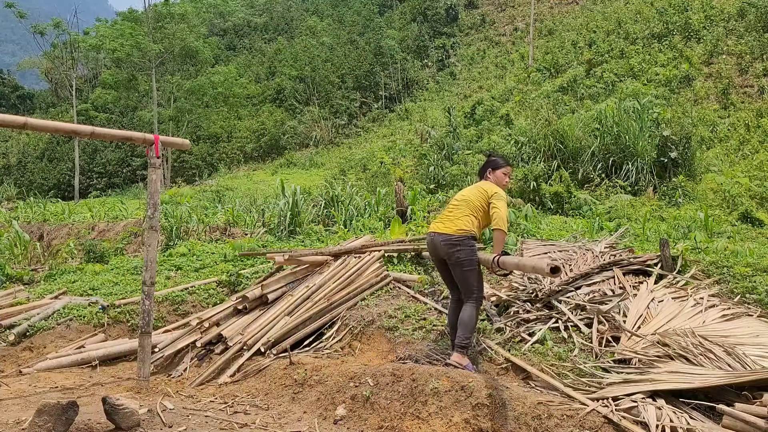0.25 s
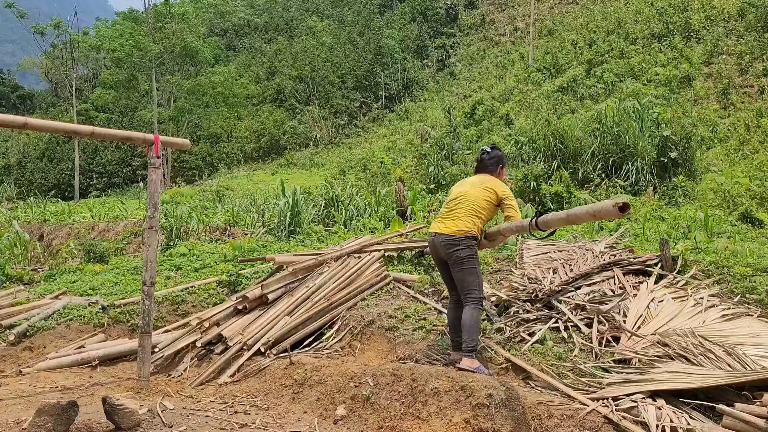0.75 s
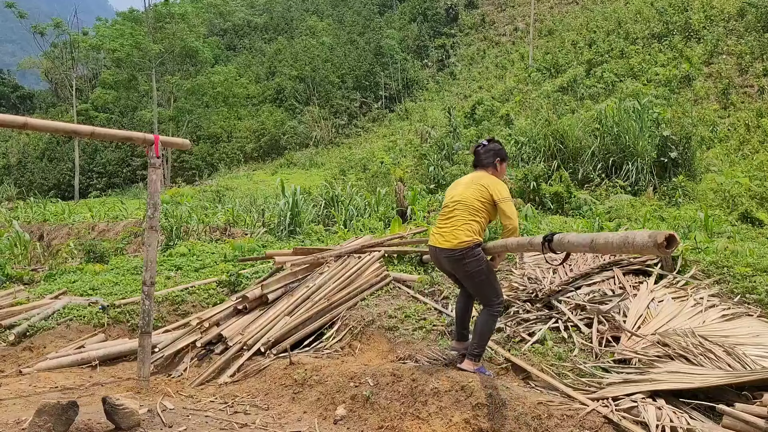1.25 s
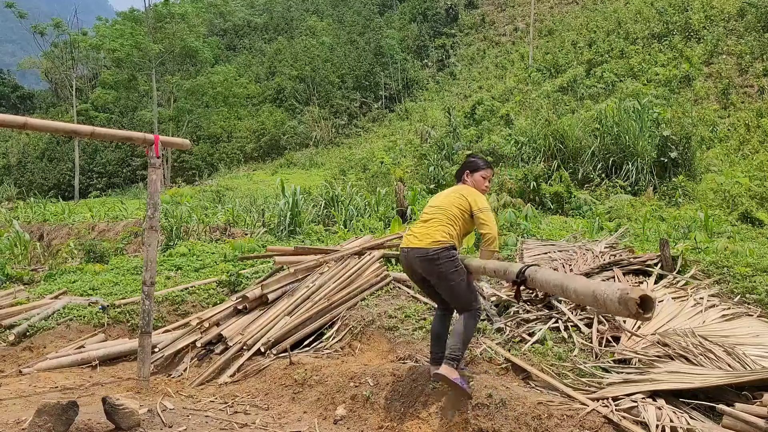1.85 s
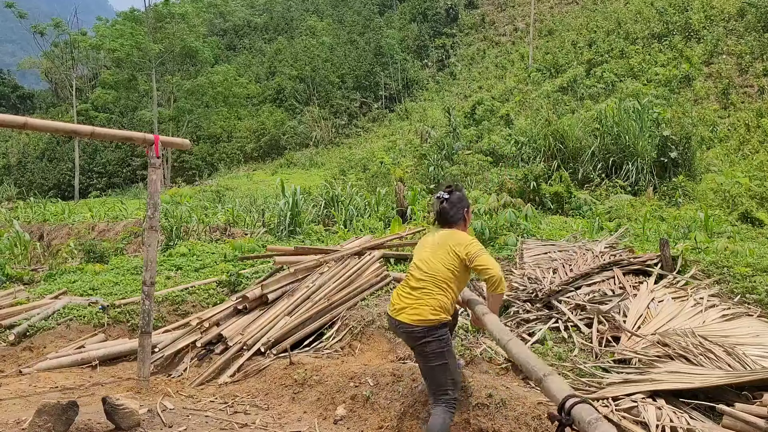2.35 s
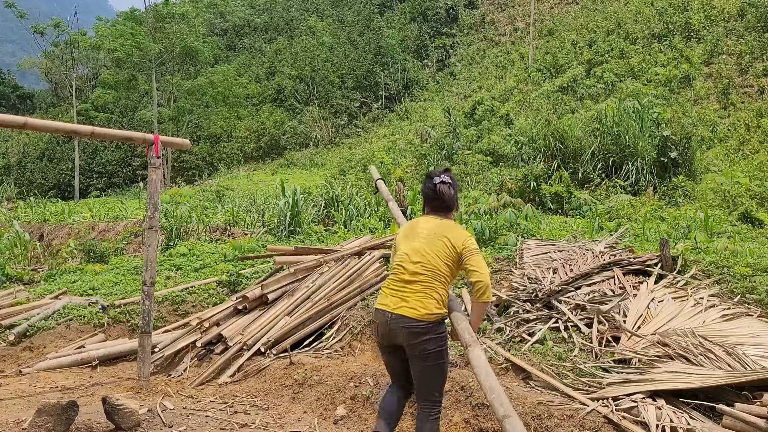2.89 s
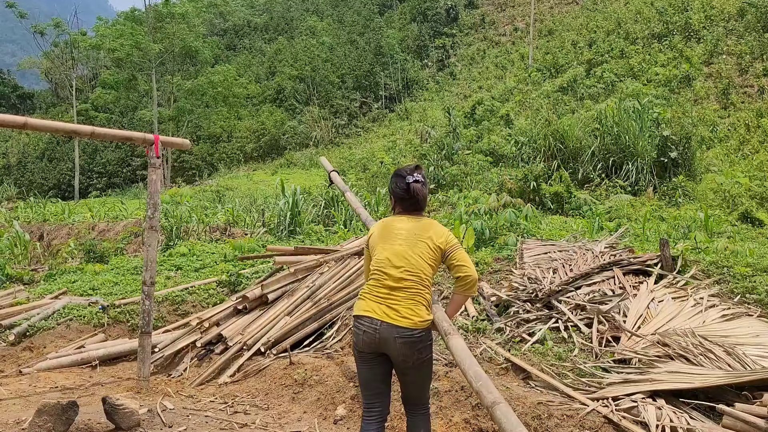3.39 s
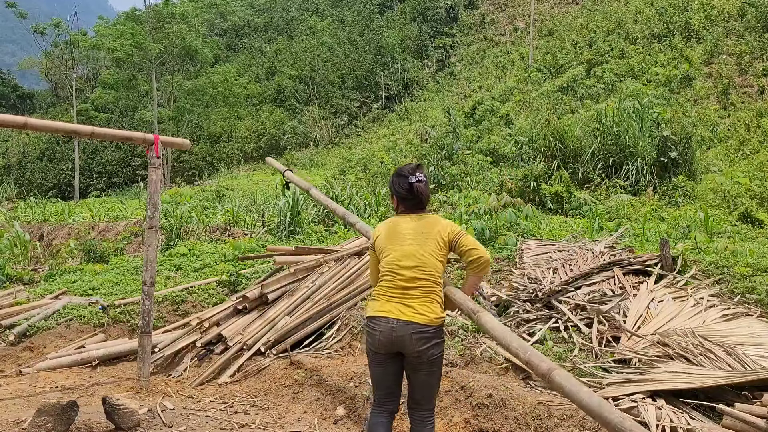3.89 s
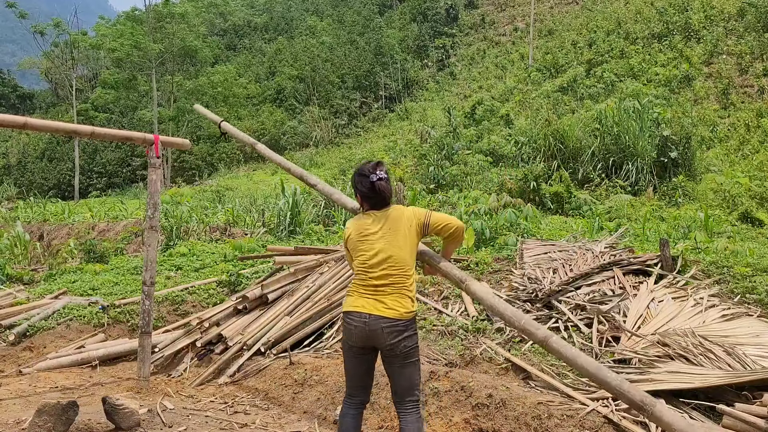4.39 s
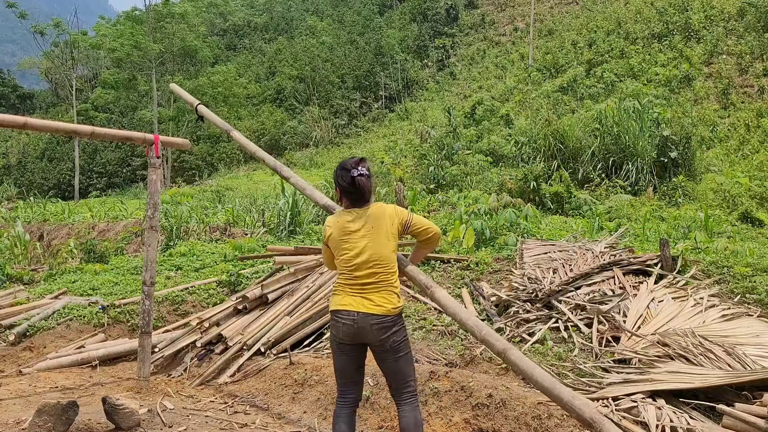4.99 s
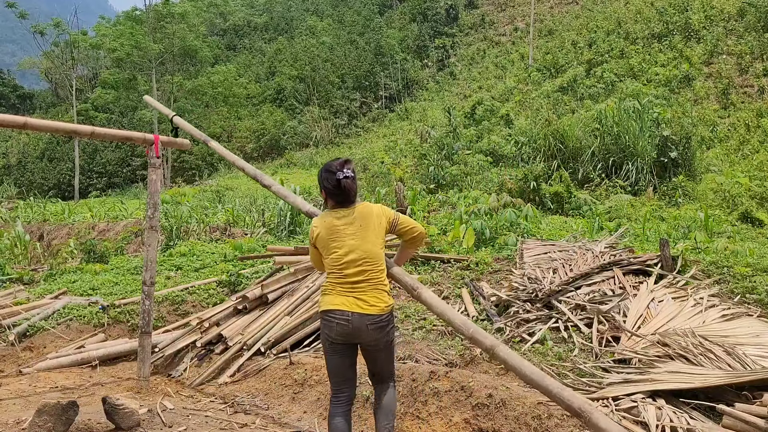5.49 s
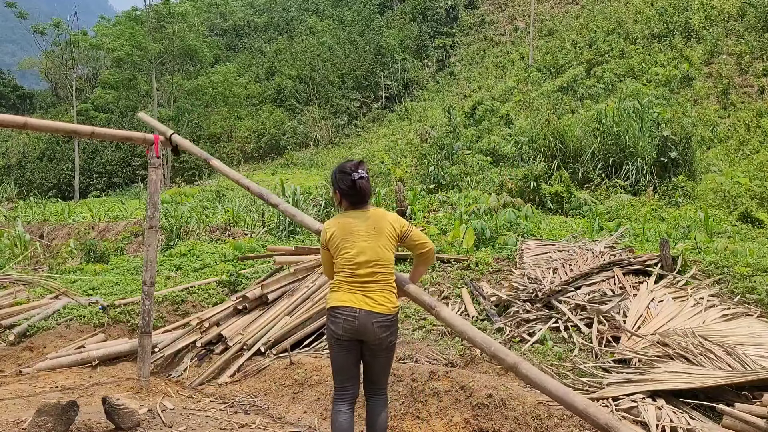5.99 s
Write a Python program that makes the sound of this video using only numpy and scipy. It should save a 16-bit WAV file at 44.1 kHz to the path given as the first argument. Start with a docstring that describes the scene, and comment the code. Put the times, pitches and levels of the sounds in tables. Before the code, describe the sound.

An open hillside with very quiet air, faint far insects and a little echo from trees. From 0 to 0.9 s a hollow bamboo pole knocks irregularly on a pile, strongest around 0.5 and 0.85, with dull short-ringing thuds, scraping and dry leaf rustle. More lighter knocks and sliding run from 1.2 to 1.9 s, while a small bird repeats quick two-note chirps from 1 to 1.8. It calms; leaves scuff at 2.2, then a hollow bump and bright dry snaps come at 2.9, with small crackles afterward. The bird returns from 3.6 to 4.8. At 4.5 a loud, hollow woody clack bursts in a tight cluster. Strong low wind puffs buffet the microphones from 5.0 to 5.8. Hard knocks follow at 5.75 and 5.88, toward the left, and a lighter one at 6.25, with a last chirp.

```python
"""On an open hillside a long hollow bamboo pole is dragged off a pile, swung round and knocked against a frame.
Clicks of contact set off the pole's fading tones; sparse clicks and noise make dry leaves rustle and snap.
Filtered noise and short low waves make wind puff at the microphones, and noise in drifting patches makes the
quiet air and far insects. Wavering tones along pitch curves make a small bird's two-note song and farther calls."""
import sys
import numpy as np
from scipy import signal
from scipy.fft import rfft, irfft
from scipy.io import wavfile
from scipy.ndimage import uniform_filter1d, map_coordinates

SR = 44100
rng = np.random.default_rng(int(sys.argv[2]) if len(sys.argv) > 2 else 0)


def bounce(signal):
    """Save signal as a 16-bit WAV file at the path given by the first command-line argument."""
    frames = np.transpose(np.atleast_2d(signal))
    limited = np.clip(frames, -1, 1)
    pcm = np.round(limited * 32767).astype(np.int16)
    wavfile.write(sys.argv[1], SR, pcm)


N = 275625

# Blows and bounces of the pole: [t/s, strength as base level/dB, hardness as clack over hollow thud level/dB,
# favoured f/Hz]
KNOCKS = [(0.0, -51.5, -5.5, 350), (.118, -44.5, 9, 1140), (.135, -54, -18.5, 310), (.184, -52.5, -4, 1250),
          (.341, -57.5, -18.5, 320), (.373, -56.5, -10, 310), (.426, -61.5, -11, 310),
          (.476, -47.5, -10.5, 320), (.493, -38, -5, 310), (.53, -37.5, -10, 350), (.573, -49.5, -5.5, 360),
          (.654, -43, -5.5, 355), (.69, -46.5, -4.5, 240), (.825, -42, -13.5, 490), (.839, -41, -8, 245),
          (.859, -43, -8, 300), (.886, -47, -7, 300), (1.184, -44, -9, 360), (1.201, -53, -8, 350),
          (1.247, -50.5, -11, 430), (1.304, -59, -11, 310), (1.333, -50, -2.5, 990),
          (1.402, -63.5, -27, 240), (1.477, -50.5, -3, 235), (1.559, -56.5, -1, 740), (1.638, -71, 8, 1200),
          (1.718, -61, 3, 1050), (1.829, -50, -5.5, 1090), (1.846, -59.5, -19, 300),
          (2.273, -60.5, 5, 1945), (2.887, -41.5, -10.5, 350), (2.913, -45.5, -8, 590),
          (2.95, -56, -12.5, 240), (4.488, -23, -3, 715), (4.494, -25.5, -4, 420), (4.508, -22.5, -10, 665),
          (4.528, -28, -2.5, 700), (4.544, -32.5, 8, 310), (4.594, -57, -19, 363), (4.621, -68.5, 4, 2200),
          (5.666, -65, -21, 250), (5.756, -24.5, -0.5, 420), (5.774, -28.5, -7, 450),
          (5.827, -46.5, -12, 460), (5.875, -25, 9.5, 660), (5.89, -38, -14, 435),
          (5.945, -61.5, -27.5, 450), (6.145, -67, -9, 440), (6.244, -33.5, 4.5, 575)]
# Ring of the pole walls and of the air between the nodes: [f/Hz, relative level/dB, time to fall 60 dB t/s]
POLE_MODES = [(85, -22.5, 0.28), (120.2, -14, 0.17), (241.8, 3, 0.073), (307, 0, 0.11), (355.3, -1, 0.12),
              (426.4, -1, 0.13), (498.8, -6, 0.12), (581, 10, 0.017), (680, -1.5, 0.065), (729.6, 0, 0.035),
              (853, 2, 0.024), (1013, 4, 0.017), (1155, -4, 0.035), (1260, -3.5, 0.032), (1390, -6.5, 0.03),
              (1505, -4.5, 0.028), (1718, -4.5, 0.017), (1951, -11.5, 0.037), (2193, -10, 0.033),
              (2293, -9.5, .04)]
# Tone colour of the dry crack of the contact itself: [f/Hz, relative level/dB per Hz]
CRACK_COLOUR = [(1350, -26), (2300, 3), (4660, -13), (6990, -24.5), (7640, -21.5), (10300, -30.5),
                (15000, -35), (16000, -37.5)]
# Pole sliding over the pile: [t/s, pressure as base level/dB]
DRAG = [(0.0, -73), (0.15, -63), (0.56, -71), (0.74, -56.5), (0.92, -73), (1.17, -65), (1.4, -54.5),
        (1.57, -73.5), (1.8, -70), (1.98, -73), (2.1, -106)]
# The knocking end moves from the middle to the right, then to the left: [t/s, lag of the left ear/samples]
SWING = [(0, 0), (2.2, 2), (2.9, 8), (4.5, 8), (5.6, -7), (6.25, -8)]
# Dry leaves stirred: [t/s, fine hiss level/dB, coarser crackle over the hiss level/dB]
RUSTLE = [(0.0, -50, -4), (0.08, -66, -4), (0.3, -69, -9), (0.5, -59, -6.5), (0.63, -62, -1.5),
          (0.73, -59.5, -2), (0.85, -63, -6), (1.34, -56.5, -3.5), (1.64, -71, 8), (2.05, -72, -15),
          (2.82, -77, -19), (2.89, -67.5, 10.5), (3.03, -73, 6), (3.38, -63, -35), (3.78, -87, 1),
          (4.14, -84, 11), (4.47, -76, -12), (4.65, -69, -12), (5.28, -72, -1.5), (5.5, -69.5, -6.5),
          (5.88, -74.5, 19), (6.25, -86, 8)]
# Feet or the pole end brushing dry leaves: [t/s, length t/s, base level/dB]
SCUFFS = [(2.215, .13, -66), (2.97, .13, -67), (5.33, .3, -70), (4.21, .05, -72)]
# Dry leaves and fibres snapping: [t/s, base level/dB at the start, centre f/Hz]
SNAPS = [(0.469, -51, 8230), (0.4882, -38, 7600), (0.556, -43.5, 15500), (0.726, -40, 8300),
         (0.811, -39, 15500), (1.2442, -54, 8080), (1.3398, -48, 10000), (2.224, -59, 8340),
         (2.242, -70, 6700), (2.273, -56, 7740), (2.32, -51, 5180), (2.8636, -34.5, 14900),
         (2.8872, -29.5, 5030), (2.98, -40, 6640), (3.057, -48, 12100), (3.103, -41, 14540),
         (3.115, -41.5, 12300), (3.3986, -45, 14500), (3.417, -49, 12000), (3.3827, -57, 6400),
         (3.471, -50.5, 6500), (3.7554, -50.5, 11760), (4.2176, -53, 6040), (4.973, -50.5, 8360),
         (5.322, -53, 12500), (5.4973, -43, 12800), (5.5253, -45, 5300), (5.9878, -44, 10100),
         (6.007, -39, 4700)]
# Slow rise and fall of the wind rumble: [t/s, level/dB]
BREEZE = [(0.0, -81), (1.22, -79), (1.38, -54.5), (1.62, -69), (2.05, -73.5), (2.73, -83), (2.91, -46.5),
          (3.15, -62), (3.7, -66.5), (3.93, -79.5), (4.42, -73), (4.59, -54.5), (4.92, -81), (5.07, -28.5),
          (5.19, -43.5), (5.45, -29), (5.65, -43), (5.81, -38.5), (6.08, -57), (6.25, -68.5)]
# Tone colour of the wind rumble: [f/Hz, relative level/dB per Hz]
GUST_COLOUR = [(12, -44.5), (20, -20), (43, 2), (74, -8.5), (155, -16), (187, -32), (225, -28),
               (600, -58.5), (780, -90), (1320, -120)]
# Gusts at the microphones: [t/s, base level/dB, left over right level/dB]
PUFFS = [(1.496, -48, 8), (1.67, -48, 44), (2.839, -49.5, 32), (2.949, -44, 14), (2.985, -35, 2),
         (3.223, -42.5, -35), (3.517, -39, 53), (3.708, -53.5, 38), (4.021, -40, 57), (4.124, -49, -24),
         (4.436, -42.5, 15), (4.625, -39.5, 9), (4.877, -50.5, -50), (5.037, -24.5, 24), (5.081, -21, 7),
         (5.204, -38.5, 4), (5.255, -20.5, 3), (5.286, -22, -3), (5.319, -24, -8), (5.345, -19, -6.5),
         (5.428, -18, 23), (5.507, -35, 23), (5.613, -30.5, 5.5), (5.648, -30.5, 10), (5.722, -28, 22),
         (5.984, -44.5, -5), (6.144, -44, 24)]
# Tone colour of the quiet air and the far insects: [f/Hz, relative level/dB per Hz]
AIR_COLOUR = [(76, -27), (130, -4), (166, -9), (211, 5), (303, -5), (720, -11.5), (1780, -14.5),
              (2360, -9.5), (3530, -13.5), (4500, -1.5), (6090, -14), (8400, -5), (9870, -19), (15100, -17),
              (16000, -21)]
# Song phrases: [start t/s, pairs of notes, falling note base level/dB, arched note base level/dB]
SONG = [(.964, 4, -56, -52.5), (3.594, 6, -58, -57), (6.21, 1, -51, -60)]
# Faint far calls: [t/s, length t/s, start f/Hz, end f/Hz, base level/dB]
FAR_CALLS = [(2.433, 0.048, 3070, 3050, -75), (2.614, 0.055, 2960, 3190, -70),
             (2.961, 0.03, 1840, 1944, -53.5), (3.258, 0.066, 1955, 1804, -65),
             (5.027, 0.062, 3225, 3240, -70), (5.102, 0.046, 2520, 2390, -69), (5.52, 0.091, 857, 935, -71),
             (5.521, 0.039, 3150, 3060, -71)]
# Thin falling chirps of a farther bird: [start t/s, chirps, start f/Hz, base level/dB]
CHIRPS = [(2.419, 6, 6400, -77.5), (5.341, 1, 7600, -56)]

THUD_TOP_HZ, RING_TOP_HZ = 530, 920  # the pole's tones are split here into thud, ring and clack
RING_DB, RING_GROWTH, FIRM_DB = -0.5, 0.12, -39  # blows stronger than FIRM_DB ring more, weaker ones less
CHATTER_S, CRACK_DB, CRACK_GROWTH = 0.015, -7.5, 0.18  # crack level is relative to the clack
SPOT_DB, SPOT_OCTAVES = 6.5, 0.22  # the spot that is struck favours the modes near one pitch
DRAG_LAYERS_DB = [4.5, 0, -4, -12]  # thud, ring, clack, crack
SNAP_PAN_DB, SNAP_SCATTER_DB = 6.5, 9  # left over right
EDDY_HZ, ONE_PORT_HZ_PER_DB, EDDY_SCATTER = 70, -0.23, 0.15  # eddies caught by one port alone are slower
SMALL_FROM_S, SMALL_TO_S, SMALL_DB, SMALL_PAN_DB = 2.75, 4.95, -58, 22  # lesser eddies at random moments
AIR_DB = -66.5
FALL_S, FALL_TOP_HZ, FALL_DROP_HZ, FALL_BEND, FALL_SWELL = 0.035, 6280, 2680, 2, 1.8
ARCH_S, ARCH_TOP_HZ, ARCH_DEPTH_HZ = 0.045, 4334, 950
REPEAT_S, FALL_TO_ARCH_S = 0.2095, 0.066
CHIRP_S, CHIRP_END_HZ, CHIRP_REPEAT_S = 0.021, 4420, 0.128
EDGE_HZ = 15900


def amp(db):
    """Turns decibels into a plain multiplier."""
    return 10 ** (np.asarray(db) / 20)


def evened(x):
    """Scales a sound to an average strength (rms) of one."""
    return x / np.sqrt(np.mean(x ** 2) + 1e-20)


def read(points, hz):
    """Reads a spectrum table between its points, along a logarithmic pitch axis."""
    f, value = np.transpose(points)
    return np.interp(np.log(hz + 1), np.log(f + 1), value)


def follow(rows):
    """Columns of a curve table, one value a sample."""
    s, *columns = np.transpose(rows)
    return [np.interp(np.arange(N) / SR, s, c) for c in columns]


def add(mix, s, sound):
    """Lays a sound into the mix at a moment, cut at the end of the mix."""
    part = mix[:, round(s * SR):][:, :sound.shape[-1]]
    part += sound[..., :part.shape[1]]


def panned(db):
    """Left and right multipliers for a level difference, left over right."""
    return amp(np.array([[db / 2], [-db / 2]]))


def coloured(x, points):
    """Filters by a spectrum."""
    return irfft(rfft(x) * amp(read(points, np.fft.rfftfreq(x.shape[-1], 1 / SR))), x.shape[-1])


def grains(per_s, spread_db):
    """Sparse clicks of either sign, a few of them large, other ones in each ear."""
    size = amp(spread_db * np.minimum(rng.exponential(1, (2, N)), 5))
    size *= rng.choice([-1, 1], (2, N))
    return evened(size * (rng.random((2, N)) < per_s / SR))


def ring(lo_hz, hi_hz, spot_hz=1, spot_db=0):
    """Answer of the modes in a range to one click; energy 1 before the struck spot favours some modes."""
    hz, db, t60 = np.array([mode for mode in POLE_MODES if lo_hz < mode[0] < hi_hz]).T[..., None]
    t = np.arange(6000) / SR
    onset = 1 - np.exp(-t / 0.00081)
    modes = amp(db - 60 * t / t60) * np.sin(2 * np.pi * hz * t) * onset
    modes[::2] *= -1  # every other mode starts the opposite way
    favour = amp(spot_db * np.exp(-(np.log2(hz / spot_hz) / SPOT_OCTAVES) ** 2))
    return ((favour * modes).sum(0) / np.linalg.norm(modes.sum(0)))[None]


def pole_layers(crack, spot_hz=1, spot_db=0):
    """Stacks the pole's thud, ring and clack answers to a click over its dry crack."""
    edges_hz = [0, THUD_TOP_HZ, RING_TOP_HZ, SR]
    bands = [ring(lo, hi, spot_hz, spot_db) for lo, hi in zip(edges_hz[:-1], edges_hz[1:])]
    return np.vstack(bands + [crack])[:, None]


def contact_crack():
    """A coloured click, faded on both sides and given energy 1."""
    click = coloured(np.roll(np.eye(1, 6000), 60), CRACK_COLOUR)
    click *= np.exp(-((np.arange(6000) - 60) / 40) ** 2)
    return click / np.linalg.norm(click)


def knocks(contacts, shares, crack):
    """Every blow is one hard contact and a short chatter of lesser ones that drive the modes of the pole."""
    sound = np.zeros((3, N))
    padded = np.pad(contacts, ((0, 0), (0, 8000)))
    t = np.arange(8000) / SR
    decay = np.exp(-t / CHATTER_S) + 0.014 * np.exp(-t / 0.065)  # the pile scatters a tail
    for s, db, hard_db, spot_hz in KNOCKS:
        struck = pole_layers(crack, spot_hz, SPOT_DB)
        force = decay * padded[:, round(s * SR):][:, :8000]
        force[0, 0] = 11.0  # the hard contact
        layers = signal.fftconvolve(shares * force, struck, axes=2)
        energy = np.sqrt((layers[:, :2] ** 2).sum((1, 2)) / (CHATTER_S * SR + 300))
        over_firm_db = db - FIRM_DB
        thud_db, clack_db = db - hard_db / 2, db + hard_db / 2
        ring_db = db + RING_DB + RING_GROWTH * over_firm_db
        crack_db = clack_db + CRACK_DB + CRACK_GROWTH * over_firm_db
        levels = amp([thud_db, ring_db, clack_db, crack_db])
        levels *= np.linalg.norm(struck[:, 0], axis=1) / energy
        add(sound, max(s - .0012, 0), np.tensordot(levels, layers, 1))
    return sound


def drag(contacts, shares, crack):
    """Sliding makes a stream of small contacts, each of which sets off the pole's tones."""
    moving = np.arange(N) < DRAG[-1][0] * SR
    sliding = amp(follow(DRAG)[0]) * moving * contacts
    sound = np.zeros((3, N))
    for answer, share, db in zip(pole_layers(crack), shares, DRAG_LAYERS_DB):
        sound += signal.oaconvolve(sliding * share * amp(db), answer, axes=1)[:, :N]
    return sound


def pole():
    """Knocks and drag share one stream of contacts; a changing lag between the ears moves the common part."""
    contacts = np.vstack([grains(700, 3.73)[:1], grains(4000, 1.9)])  # heard by both ears, by left, by right
    apart = np.array([.1, .15, .5, .7])  # share of each layer that differs between the ears
    shares = np.sqrt([1 - apart, apart, apart]).T[..., None]
    crack = contact_crack()
    sound = knocks(contacts, shares, crack) + drag(contacts, shares, crack)
    sound = signal.sosfilt(signal.butter(2, 75, "high", fs=SR, output="sos"), sound)
    half_lag = follow(SWING)[0] / 2
    ears = [map_coordinates(sound[0], [np.arange(N) + side * half_lag], order=3, mode="nearest")
            for side in (-1, 1)]
    return (np.array(ears) + sound[1:]) * panned(0.45)


def scuffs(brushed):
    """Short stretches of leaf crackle whose level wavers as the brushing catches and slips."""
    out = np.zeros((2, N))
    uneven = amp(4.3 * evened(uniform_filter1d(rng.standard_normal(N), 300)))
    for s, length, db in SCUFFS:
        brush = (brushed * uneven)[:, round(s * SR):][:, :round(length * SR)]
        add(out, s, amp(db) * brush * signal.windows.tukey(brush.shape[1], .5))
    return out


def snaps():
    """Each snap is a burst of coloured noise that dies at once, over a weaker, longer tail."""
    out = np.zeros((2, N))
    t = np.arange(900) / SR
    fade = np.exp(-t / .0012) + .07 * np.exp(-t / .014)
    noise = rng.standard_normal((len(SNAPS), 2, 900))
    pans_db = SNAP_PAN_DB + SNAP_SCATTER_DB * rng.standard_normal(len(SNAPS))
    for (s, db, hz), pan_db, n in zip(SNAPS, pans_db, noise):
        burst = evened(coloured(n, [(hz / 6, -22), (hz / 2, -9), (hz, 0), (hz * 2, -6)]))
        add(out, s, amp(db) * panned(pan_db) * burst * fade)
    return out


def leaves():
    """Fine crackle under the feet and the pole: clicks and noise in a high and a low band, with single snaps."""
    fine_db, coarse_over_fine_db = follow(RUSTLE)
    crackle = grains(5000, 2.8) + .5 * rng.standard_normal((2, N))
    high = evened(coloured(crackle, [(3000, -28.5), (8000, -3), (12000, -3), (16000, -7.0)]))
    low = evened(coloured(crackle, [(900, -14), (2500, -5.5), (5000, -3.5), (9000, -16.5), (12000, -21.0)]))
    rustle = amp(fine_db) * (high + amp(coarse_over_fine_db) * low)
    return rustle + scuffs(0.49 * high + low) + snaps()


def eddies():
    """Single eddies at the microphone ports: low waves of a cycle or two that swell and fade."""
    out = np.zeros((2, N))
    small = rng.uniform([SMALL_FROM_S, SMALL_DB - 5, -SMALL_PAN_DB],
                        [SMALL_TO_S, SMALL_DB + 4, SMALL_PAN_DB], size=(14, 3))
    puffs = np.vstack([PUFFS, small])
    phases, chances = rng.random((len(puffs), 2, 1)), rng.standard_normal(len(puffs))
    for (s, db, pan_db), phase, chance in zip(puffs, phases, chances):
        hz = (EDDY_HZ + ONE_PORT_HZ_PER_DB * abs(pan_db)) * (1 + EDDY_SCATTER * chance)
        turns = np.arange(-round(3 * SR / hz), round(3 * SR / hz)) * hz / SR
        eddy = np.sin(2 * np.pi * (turns + phase))
        eddy = eddy + 0.085 * eddy ** 3  # sharper crests add a rasp above
        swell = np.exp(-(turns / np.where(turns < 0, .6, .9)) ** 2)
        ports = panned(pan_db) / np.sqrt(np.mean(panned(pan_db) ** 2))
        add(out, s - 3 / hz, amp(db) * ports * eddy * swell)
    return out


def wind():
    """Lumpy rumble of low noise, unrelated at the two ports, with single eddies."""
    lumps = evened(uniform_filter1d(uniform_filter1d(rng.standard_normal((2, N)), 900), 900))
    lumpy = rng.standard_normal((2, N)) * amp(6.23 * lumps)
    rumble = evened(coloured(lumpy, GUST_COLOUR)) * amp(follow(BREEZE)[0])
    return rumble + eddies()


def hillside():
    """Far insects in two bands over the quiet air: noise whose level drifts in patches of time and pitch."""
    frames, hz = N // 128 + 5, np.fft.rfftfreq(512, 1 / SR)
    a, b, patches = rng.standard_normal((frames, 257, 2, 3)).T
    patches = evened(uniform_filter1d(uniform_filter1d(patches[0], 8, 0), 30, 1))
    z = (a + 1j * b) * amp(read(AIR_COLOUR, hz)[:, None] + 2.8 * patches)
    air = signal.istft(z, nperseg=512, noverlap=384)[1][:, :N]
    return amp(AIR_DB) * evened(air)


def whistle(track, db, fuzz=0.4, smooth=120, swell=1):
    """A near sine along a pitch track, wavering in strength and phase; swell over 1 peaks late."""
    s, hz = np.transpose(track)
    t = np.arange(0, s[-1], 1 / SR)
    pitch = uniform_filter1d(np.interp(t, s, hz), size=200, mode="nearest")
    drift = uniform_filter1d(uniform_filter1d(rng.standard_normal((2, 6000)), smooth), smooth)
    a, b = evened(drift)[:, :len(t)]
    waver = (1 + fuzz * (a + 1j * b)) / np.sqrt(1 + 2 * fuzz ** 2)
    tone = waver * np.exp(2j * np.pi * np.cumsum(pitch) / SR)
    return amp(db) * np.sqrt(2) * tone.real * np.sin(np.pi * (t / s[-1]) ** swell)


def song(dry):
    """Repeats a pair of notes: one falls ever faster in pitch, the other arches up and down."""
    u = np.linspace(0, 1, num=9)
    fall = np.transpose([u * FALL_S, FALL_TOP_HZ - FALL_DROP_HZ * u ** FALL_BEND])
    arch = np.transpose([u * ARCH_S, ARCH_TOP_HZ - ARCH_DEPTH_HZ * (2 * u - 1) ** 2])
    for start, pairs, fall_db, arch_db in SONG:
        for k in range(round(pairs)):
            s = start + k * REPEAT_S
            add(dry, s, whistle(fall, fall_db, fuzz=.6, swell=FALL_SWELL))
            add(dry, s + FALL_TO_ARCH_S, whistle(arch, arch_db))


def far_birds(dry):
    """Blurred calls and thin falling chirps, each a whistle gliding between two pitches."""
    for s, length, start_hz, end_hz, db in FAR_CALLS:
        add(dry, s, whistle([(0, start_hz), (length, end_hz)], db, fuzz=1.2, smooth=140))
    for start, chirps, start_hz, db in CHIRPS:
        for k in range(round(chirps)):
            add(dry, start + k * CHIRP_REPEAT_S, whistle([(0, start_hz), (CHIRP_S, CHIRP_END_HZ)], db))


def tree_echoes(dry):
    """Smears a sound over fading noise, as many small echoes off the trees do."""
    t = np.arange(12000) / SR
    trees = rng.standard_normal((2, 12000)) * amp(-60 * t / 0.41) * np.minimum(t / 0.0065, 1)
    return signal.fftconvolve(dry, trees / np.linalg.norm(trees[0]), axes=1)[:, :N]


def birds():
    """The song and the far calls, smeared by echoes off the trees."""
    dry = np.zeros((1, N))
    song(dry)
    far_birds(dry)
    late = np.pad(dry, ((0, 0), (9, 0)))[:, :N]  # to one side: it reaches the right ear 9 samples later
    return np.vstack([dry, late]) * panned(1.1) + amp(-1) * tree_echoes(dry)


def scene():
    """Adds up everything heard on the hillside."""
    return pole() + leaves() + wind() + hillside() + birds()


def record(dry):
    """The loudest peaks round off in the preamplifier; then a filter removes the treble above EDGE_HZ."""
    rounded = .85 * np.tanh(dry / .85)
    band_limit = signal.firwin(511, EDGE_HZ, window=("kaiser", 9), fs=SR)
    return signal.oaconvolve(rounded, band_limit[None], "same")


dry = scene()
out = record(dry)
bounce(out)
```